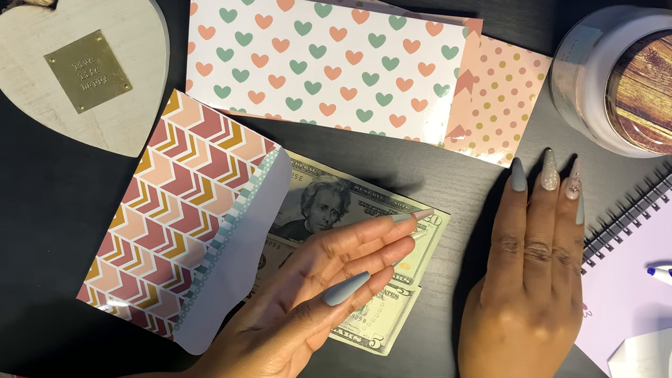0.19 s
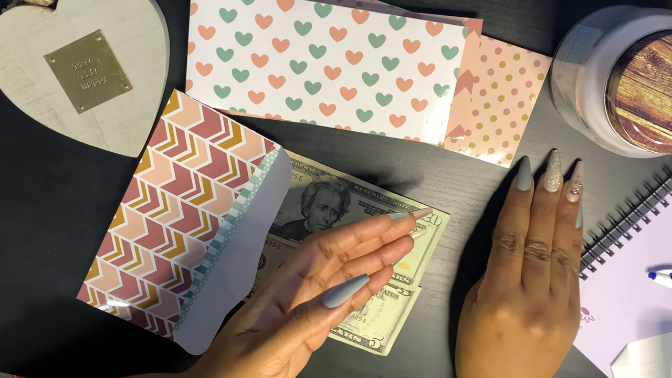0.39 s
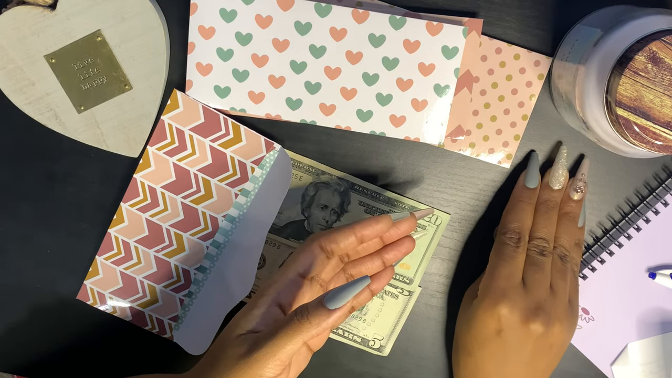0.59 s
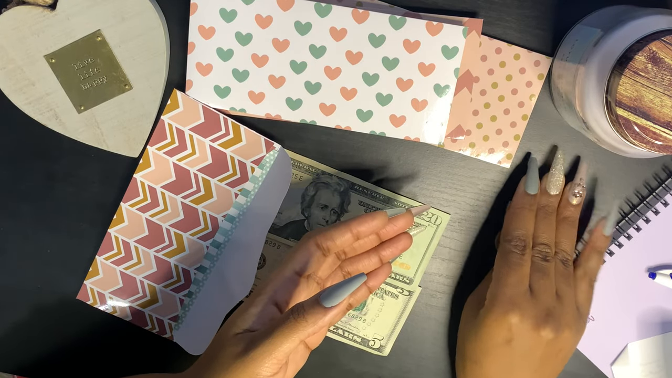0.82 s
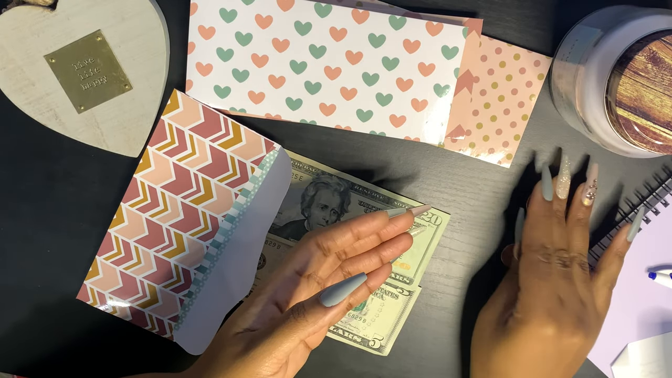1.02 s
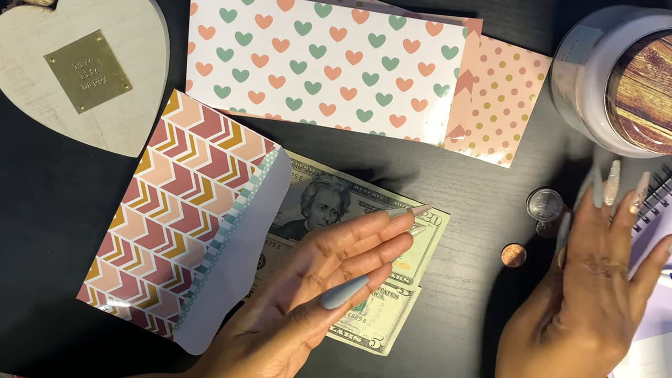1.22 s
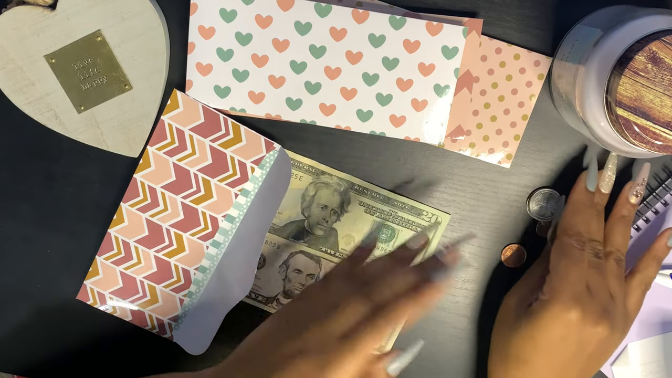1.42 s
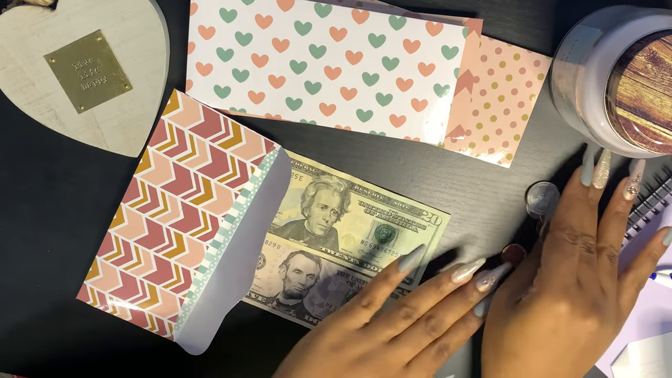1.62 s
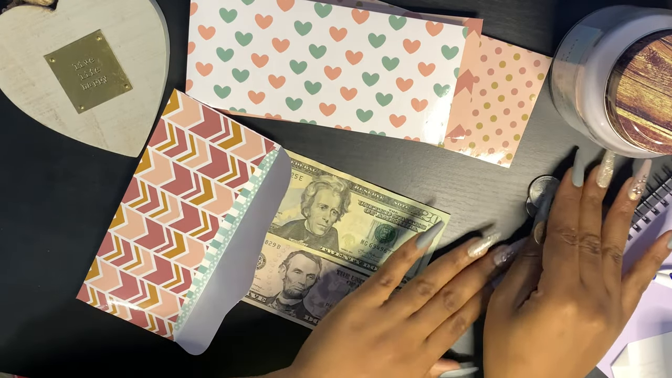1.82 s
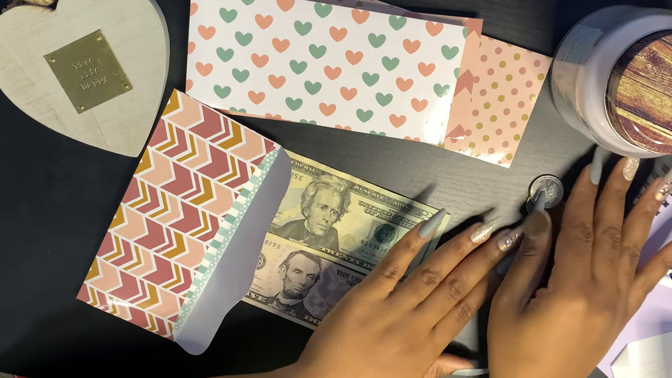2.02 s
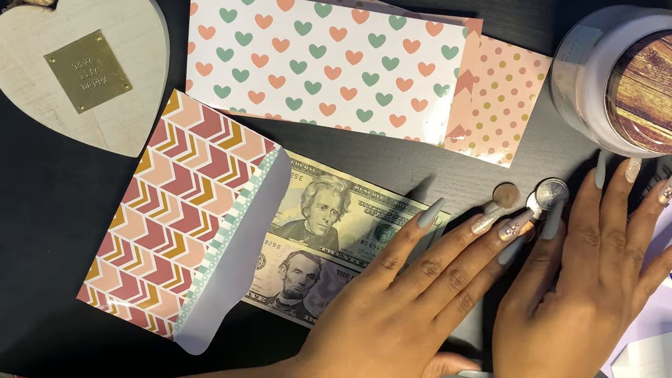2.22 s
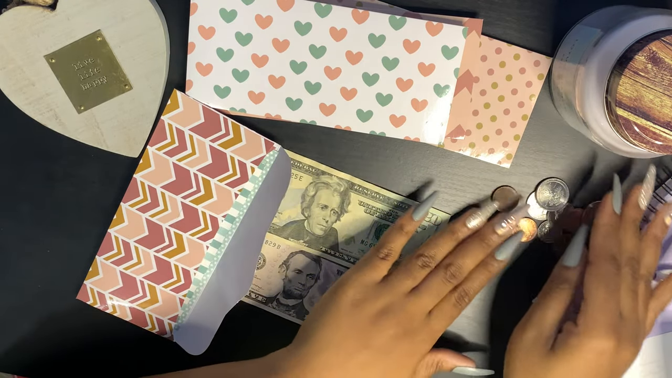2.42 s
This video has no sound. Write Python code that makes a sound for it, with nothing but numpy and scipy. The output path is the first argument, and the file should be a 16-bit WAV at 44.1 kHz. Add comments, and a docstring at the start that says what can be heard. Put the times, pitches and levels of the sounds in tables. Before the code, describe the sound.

Coins are set down by hand on a hard tabletop with a dull knock, then slid together with clinks and clacks, ending in quick light rasps; small quiet room, close stereo microphones.

```python
"""A soft hush of room air comes first; then coins are set down by hand on a hard tabletop, close to two microphones.
The coins are pushed together into a small heap, and a quick run of short, ringing rasps follows.
Each contact thumps the tabletop, clacks, and rings the finger-damped coins.
Sliding drives the same three sounds with dense stick-slip grains; rasps are grains too, and a skin brush is noise.
A small, quiet room surrounds it all."""
import sys
import numpy as np
from scipy import signal
from scipy.fft import rfft, irfft
from scipy.io import wavfile
from scipy.ndimage import uniform_filter1d

SR = 44100
rng = np.random.default_rng(int(sys.argv[2]) if len(sys.argv) > 2 else 0)


def dump_mix(stems):
    """Bounce the given channels to the path in sys.argv[1] as a 16-bit WAV at rate SR."""
    frames = np.atleast_2d(stems).T  # one column per channel
    limited = np.clip(frames, -1, 1)  # hard clip at full scale
    pcm = np.round(limited * 32767).astype(np.int16)
    wavfile.write(sys.argv[1], SR, pcm)


N = 108045

# coins touching the top: t/s, tabletop level/dB, clack level/dB, coin treble level/dB
COIN_CONTACTS = [(.145, -54, -55.5, -53.5), (0.2158, -21, -52, -56), (0.249, -39.5, -43.5, -36),
                 (0.298, -36.5, -50, -57), (0.4087, -24, -25, -26), (0.7988, -44, -51, -35.5),
                 (.835, -33.5, -34, -30), (0.9263, -48, -42, -50.5), (.984, -42, -50.5, -43.5),
                 (1.099, -53.5, -49.5, -44), (1.3642, -44.5, -43, -37.5), (1.393, -47, -46.5, -40),
                 (1.466, -41.5, -73, -71), (1.5126, -47, -51, -42.5), (1.655, -41, -36.5, -36.5),
                 (1.679, -39.5, -30, -26.5), (1.697, -55, -34, -38), (1.775, -48, -31, -32.5),
                 (1.802, -43, -27.5, -33), (1.8562, -62, -30.5, -33.5), (1.9683, -39, -31, -37.5),
                 (2.034, -62, -52, -31), (2.045, -29.5, -21, -51), (2.079, -35, -27, -30.5),
                 (2.166, -46.5, -44, -42.5)]
# coins sliding on the top: middle t/s, half length t/s, tabletop level/dB, clack level/dB, coin treble level/dB
COIN_SLIDES = [(.212, 0.0072, -38, -27.5, -28), (.832, 0.021, -41.5, -38, -36.5),
               (.96, 0.066, -52, -57.5, -62), (1.11, 0.022, -58.5, -61, -65),
               (1.412, 0.018, -52, -55, -48.5), (1.56, 0.06, -55, -57, -57),
               (1.487, 0.004, -43.5, -41.5, -39), (1.695, 0.032, -42, -38.5, -36.5),
               (1.768, 0.019, -39, -33.5, -33), (1.806, 0.0054, -50, -34.5, -27.5),
               (1.84, 0.049, -46, -41.5, -41), (1.995, 0.023, -46.5, -44, -49.5),
               (2.11, 0.018, -44, -36, -44.5), (2.32, 0.16, -57, -57.5, -84)]
# short rasps: middle t/s, half length t/s, level/dB
RASP_STROKES = [(2.115, 0.0043, -33.5), (2.196, 0.0071, -36), (2.263, 0.0038, -35), (2.33, 0.0068, -38.5),
                (2.386, 0.0069, -36.5), (2.446, 0.0063, -33.5)]
# skin brushing over the top: middle t/s, half length t/s, level/dB
SKIN_BRUSHES = [(.698, 0.026, -54.5)]
# the hand bearing down as it pushes the coins: middle t/s, half length t/s, level/dB
HAND_RUBS = [(1.68, .022, -51), (1.785, 0.048, -52.5)]
# resonances of the tabletop: f/Hz, level/dB
TABLE_RESONANCES = [(211, 1), (345, -3), (420, 2.5), (625, -3.5), (711, 2), (850, 0.5), (925, 2), (1008, 3),
                    (1690, 2)]
# resonances of the coins: f/Hz, level/dB
COIN_RESONANCES = [(7450, -12.5), (9440, -2.5), (12835, -7), (15290, 3.5)]
# resonances of choked coins, within the clack: f/Hz, level/dB
CLACK_RESONANCES = [(2900, -2), (4400, 2.5), (7000, 0.5)]
# resonances rung by the rasps: f/Hz, level/dB
RASP_RESONANCES = [(1710, 0.5), (2010, 1), (2370, -2.5), (3770, 2.5), (4480, -1)]
# tone colour of the tabletop thump: f/Hz, relative level/dB
THUMP_COLOUR = [(40, -30), (130, -3.5), (400, 1.5), (570, -6), (920, -1.5), (1750, -2), (2250, -4),
                (16000, -47.5)]
# tone colour of dragging on the tabletop: f/Hz, relative level/dB
DRAG_COLOUR = [(130, -8.5), (650, 1), (2000, -3)]
# tone colour of the clack: f/Hz, relative level/dB
CLACK_COLOUR = [(200, -23.5), (1300, -18), (2000, 5), (4300, 2.5), (5400, -4.5), (7100, 1.5),
                (10000, -17.5), (16000, -42.5)]
# tone colour of the bright coin tick: f/Hz, relative level/dB
TICK_COLOUR = [(6000, -20), (9300, 7.5), (10900, 1.5), (12300, 3), (14000, -7), (15400, 3)]
# tone colour of the rasps: f/Hz, relative level/dB
RASP_COLOUR = [(150, -14.5), (950, -4), (4600, -0.5), (7900, -10.5), (13000, -21), (14200, -40.5)]
# tone colour of the brushing skin: f/Hz, relative level/dB
SKIN_COLOUR = [(200, -9), (800, 2), (1900, -13.5), (12000, -54)]
# tone colour of the room air: f/Hz, relative level/dB
AIR_COLOUR = [(25, -28), (62, 5.5), (120, 4.5), (400, -15.5), (2400, -22), (16000, -40)]

# T60 is the time a sound takes to fall by 60 dB
AIR_DB = -69
ROOM_T60_S, CLACK_ROOM_DB, TICK_ROOM_DB, RASP_ROOM_DB, SKIN_ROOM_DB = 0.2, -3.5, -24.5, -1, -1
EAR_LAG_S = .000179  # delay between the two microphones
TOP_HZ = 15900
RASP_RING_DB, RASP_RING_T60_S = -0.5, 0.033
RUB_HZ = 407  # the soft hand passes only the bass to the top
TABLE_T60_S, TABLE_TAIL_DB, TABLE_TAIL_T60_S = 0.054, -3, 0.25
TABLE_RING_DB, TABLE_RING_T60_S = -5.5, 0.22
TABLE_LAG_S = 0.001021  # the thump comes this long after the clack's set time
TABLE_LEFT_DB, WIDE_HZ, TABLE_SIDE_DB = 2, 690, -3  # left over right; stereo width lies above WIDE_HZ
CLACK_T60_S, CLACK_TAIL_DB, CLACK_RING_DB, CLACK_RING_T60_S = 0.24, -9.5, -7.5, 0.0081
TICK_T60_S, TICK_TAIL_DB, COIN_RING_DB, COIN_RING_T60_S = 0.14, -8, -1.5, 0.058
COINS_FREE_S, HELD_DB = .6, -25.5  # the first coins are pressed flat under a finger and hardly ring
CHATTER_S, TOUCH_S, TOUCH_DB = 0.00054, 0.0035, -13.5
GRAINS_PER_S, GRAIN_SCATTER_DB = 1100, 4.5
# chance drifts: size in dB, new values per second
PLACE_DB, PLACE_PER_S = 4.5, 25
SHIFT_DB, SHIFT_PER_S = 3, 22
GRIP_DB, GRIP_PER_S = 3, 90


def amp(db):
    """Turn decibels into a gain."""
    return 10 ** (np.asarray(db) / 20)


def unit(x):
    """Scale to unit energy, averaged over the channels."""
    return x / np.sqrt(np.mean(np.sum(x ** 2, axis=-1)) + 1e-20)


def seconds(size=N):
    """Give the time of every sample."""
    return np.arange(size) / SR


def through(x, response):
    """Pass a sound through a response, with one or two channels on either side."""
    return signal.fftconvolve(np.atleast_2d(x), np.atleast_2d(response), axes=-1)[:, :N]


def colour(points, size=2048):
    """Make a unit-energy response with the given spectrum that starts at once (minimum phase)."""
    hz, db = np.array(points).T
    bins = np.fft.rfftfreq(size, 1 / SR) + 1  # one added to avoid log(0)
    spectrum_db = np.interp(np.log(bins), np.log(hz), db)
    cepstrum = irfft(np.log(amp(spectrum_db)))
    # fold the backward half onto the forward half
    cepstrum[1:size // 2] *= 2
    cepstrum[size // 2 + 1:] = 0
    return unit(irfft(np.exp(rfft(cepstrum))))


def fade(t60, size=22050):
    """Die away evenly in decibels, by 60 dB in t60 seconds."""
    return np.exp(-np.log(1000) * seconds(size) / t60)


def tail(t60, channels=1, size=22050):
    """Noise dying away stands for dense reflections or resonances."""
    return unit(rng.standard_normal((channels, size)) * fade(t60, size))


def walk(rate):
    """Slow chance: random values joined by straight lines."""
    k = int(SR / rate)
    steps = np.repeat(rng.standard_normal(N // k + 1), k)[:N]
    return uniform_filter1d(steps, k)


def wander(db, rate):
    """A gain that drifts by chance."""
    return amp(db * np.clip(walk(rate), -2, 1))


def ring(force, modes, t60):
    """Ring fading resonances; each one's share of the force changes as the point of contact moves."""
    decay, out = unit(fade(t60)), 0
    for hz, db in modes:
        turn = np.exp(2j * np.pi * hz * seconds())
        share = force * wander(PLACE_DB, PLACE_PER_S)
        mode = turn * through(share / turn, decay)  # shift down to 0 Hz, smear, shift back up
        phase = np.exp(2j * np.pi * rng.random())
        out = out + amp(db) * np.sqrt(2) * np.real(mode * phase)
    return out / np.sqrt(sum(amp(db) ** 2 for _, db in modes))


def add(track, start, x):
    """Mix a short sound into a track."""
    i = max(int(start * SR), 0)
    track[i:i + len(x)] += x[:max(N - i, 0)]


def struck(after):
    """A direct click together with its after-sound."""
    return signal.unit_impulse(after.shape[-1]) + after


def heard(response, room_db, size=32):
    """Direct sound reaches the right microphone first; the room reaches each on its own."""
    k = np.arange(size) - size // 4
    # sinc curves allow a delay by a fraction of a sample
    ears = np.array([np.sinc(k - EAR_LAG_S * SR), np.sinc(k)])
    wet = through(response, tail(ROOM_T60_S, channels=2))
    direct = through(response, ears)
    missing = wet.shape[1] - direct.shape[1]
    return amp(room_db) * wet + np.pad(direct, ((0, 0), (0, missing)))


def strokes(rows):
    """Each stroke swells and fades; one envelope for each level column."""
    t = seconds()
    power = sum(amp(levels)[:, None] ** 2 * np.exp(-((t - middle) / half) ** 2)
                for middle, half, *levels in rows)
    return np.sqrt(power)


def friction():
    """Stick-slip: dense tiny catches of uneven size and random sign."""
    caught = rng.random(N) < GRAINS_PER_S / SR
    sign = rng.choice([-1, 1], N)
    strength = amp(GRAIN_SCATTER_DB * np.clip(rng.standard_normal(N), -2, 2))
    catches = caught * sign * strength
    return catches / catches.std()


def room_air():
    """Steady coloured noise, partly shared by both sides and partly separate."""
    noise = rng.standard_normal(N) + 0.46 * rng.standard_normal((2, N))
    return amp(AIR_DB) * through(noise, colour(AIR_COLOUR))


def skin_brush():
    """Skin brushing the top is a swell of soft coloured noise."""
    noise = strokes(SKIN_BRUSHES) * rng.standard_normal(N)
    return through(noise, heard(colour(SKIN_COLOUR), SKIN_ROOM_DB))


def ringing_rasps():
    """Short bursts of stick-slip grains scrape and set resonances ringing."""
    scratch = strokes(RASP_STROKES) * friction()
    scrape = through(scratch, colour(RASP_COLOUR))
    ringing = amp(RASP_RING_DB) * ring(scratch, RASP_RESONANCES, RASP_RING_T60_S)
    return heard(scrape + ringing, RASP_ROOM_DB) / np.sqrt(2)


def hand_rub():
    """The pushing hand bears down on the top with grains whose treble its softness removes."""
    rub = signal.sosfilt(signal.butter(4, RUB_HZ, fs=SR, output="sos"), friction())
    return strokes(HAND_RUBS)[0] * rub / rub.std()


def table_sound(force):
    """A quick thump and lingering plate resonances."""
    body = tail(TABLE_T60_S) + amp(TABLE_TAIL_DB) * tail(TABLE_TAIL_T60_S)
    thump = through(force, unit(through(body, colour(THUMP_COLOUR))))[0]
    return thump + amp(TABLE_RING_DB) * ring(force, TABLE_RESONANCES, TABLE_RING_T60_S)[0]


def tabletop(force):
    """The tabletop reaches the left first; before that delay its bass is alike on both sides."""
    mid, side = table_sound(force), table_sound(force)
    high_pass = signal.butter(2, WIDE_HZ, "high", fs=SR, output="sos")
    side = amp(TABLE_SIDE_DB) * signal.sosfilt(high_pass, side)
    right = np.pad(mid - side, (int(EAR_LAG_S * SR), 0))[:N]
    balance = amp(np.array([[TABLE_LEFT_DB], [-TABLE_LEFT_DB]]) / 2)
    return np.array([mid + side, right]) * balance


def coin_clack(force):
    """The hard, short clack of metal meeting the top, with choked coin resonances."""
    click = through(force, struck(amp(CLACK_TAIL_DB) * tail(CLACK_T60_S)))
    crack = through(click, colour(CLACK_COLOUR))
    ringing = amp(CLACK_RING_DB) * ring(force, CLACK_RESONANCES, CLACK_RING_T60_S)
    return heard(crack + ringing, CLACK_ROOM_DB) / np.sqrt(2)


def coin_treble(force):
    """A bright tick and the damped ring of the discs."""
    click = through(force, struck(amp(TICK_TAIL_DB) * tail(TICK_T60_S)))
    tick = through(click, colour(TICK_COLOUR))
    free = amp(np.where(seconds() < COINS_FREE_S, HELD_DB, 0))
    ringing = amp(COIN_RING_DB) * ring(force * free, COIN_RESONANCES, COIN_RING_T60_S)
    return heard(tick + ringing, TICK_ROOM_DB)


def shifting(force, count=14):
    """As the coins turn and touch at new places, each band of the force swells and fades on its own."""
    place = np.linspace(0, count, N // 2 + 1)
    spectrum = rfft(force)
    # overlapping triangular bands
    bands = (irfft(spectrum * np.maximum(1 - np.abs(place - k), 0), N) for k in range(count))
    return sum(band * wander(SHIFT_DB, SHIFT_PER_S) for band in bands)


def slides():
    """Sliding coins catch and slip under an uneven grip; gives forces for top, clack and treble."""
    return strokes(COIN_SLIDES) * friction() * wander(GRIP_DB, GRIP_PER_S)


def contacts(size=2048):
    """The rim grazes the top, lands with one push and chatters for a moment; gives the same three forces."""
    force, lead = np.zeros((3, N)), size / 2 / SR
    t = seconds(size) - lead
    u = np.maximum(t, 0) / CHATTER_S
    graze = amp(TOUCH_DB) * np.exp(-np.abs(t) / TOUCH_S)
    shape = u * np.exp(1 - u) + graze
    blow = np.sqrt(SR / 100)  # makes the force levels means over 10 ms
    for start, table_db, clack_db, coin_db in COIN_CONTACTS:
        chatter = blow * unit(rng.standard_normal(size) * shape)
        add(force[0], start + TABLE_LAG_S, np.array([blow * amp(table_db)]))
        add(force[1], start - lead, amp(clack_db) * chatter)
        add(force[2], start - lead, amp(coin_db) * chatter)
    return force


def scene():
    """Contacts, slides and the pushing hand drive the top and the coins; rasps, skin and room air join them."""
    background = room_air() + skin_brush() + ringing_rasps()
    hit, slide = contacts(), slides()
    drag = through(slide[0] + hand_rub(), colour(DRAG_COLOUR))[0]
    top = tabletop(hit[0] + drag)
    clack = coin_clack(hit[1] + shifting(slide[1]))
    treble = coin_treble(hit[2] + shifting(slide[2]))
    return background + top + clack + treble


def record(dry):
    """The recorder cuts the highest treble with a steep low-pass filter."""
    return signal.sosfilt(signal.ellip(8, .2, 70, TOP_HZ, fs=SR, output="sos"), dry)


dry = scene()
out = record(dry)
dump_mix(out)
```